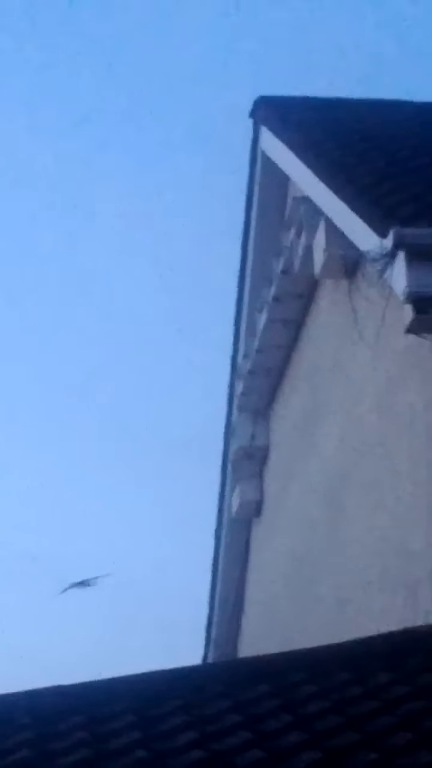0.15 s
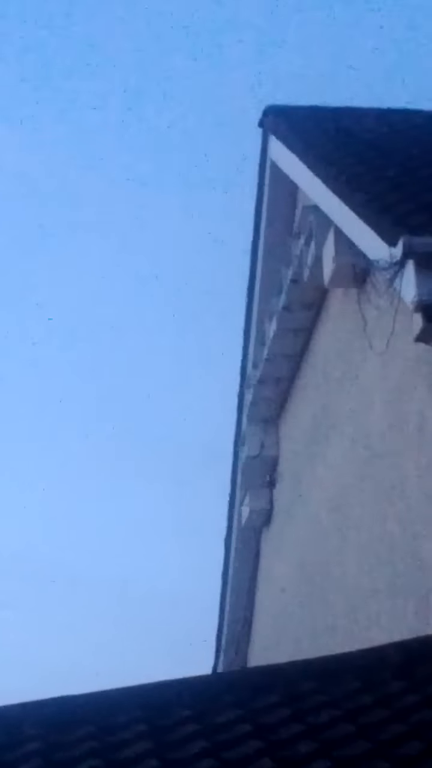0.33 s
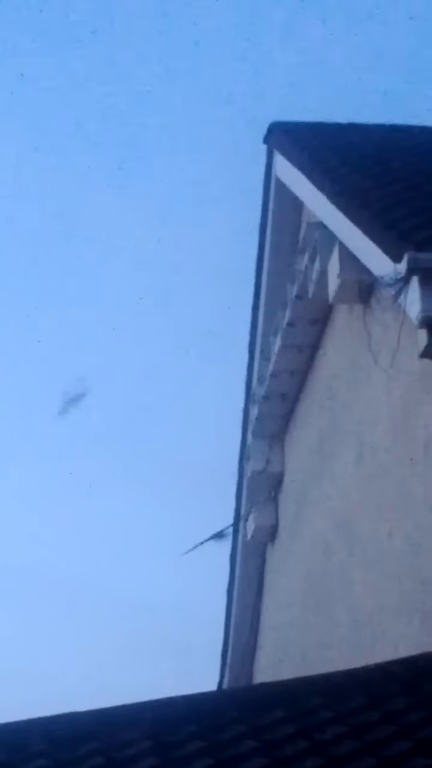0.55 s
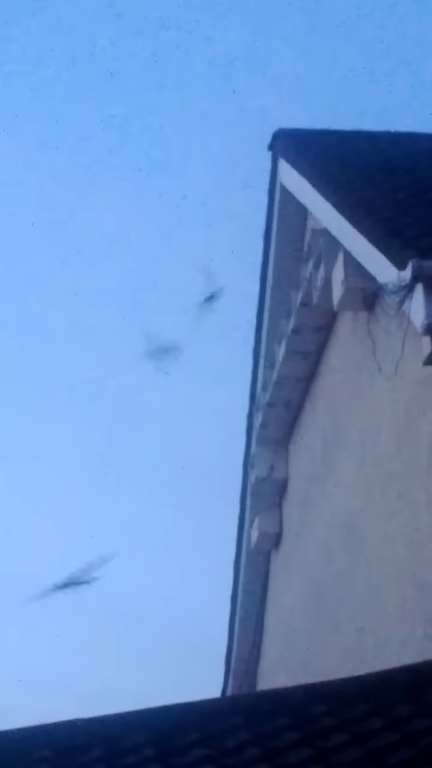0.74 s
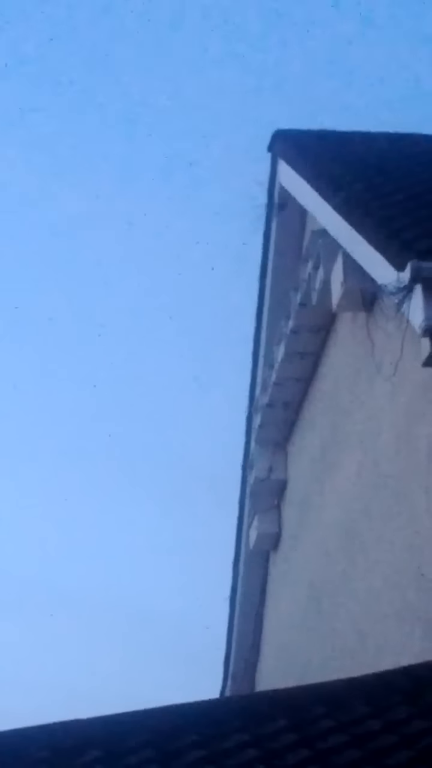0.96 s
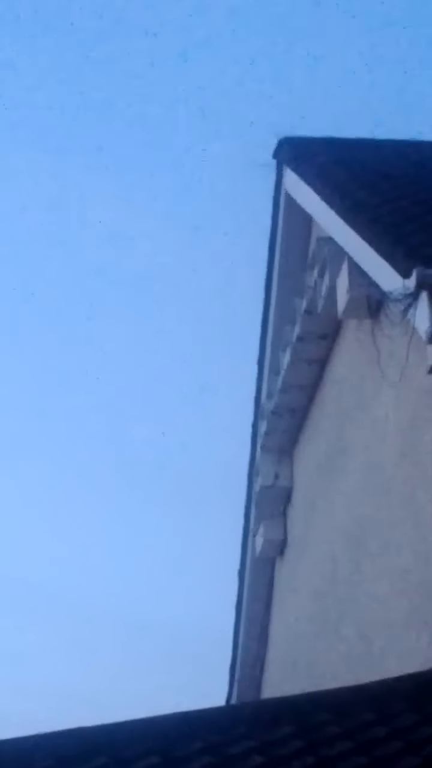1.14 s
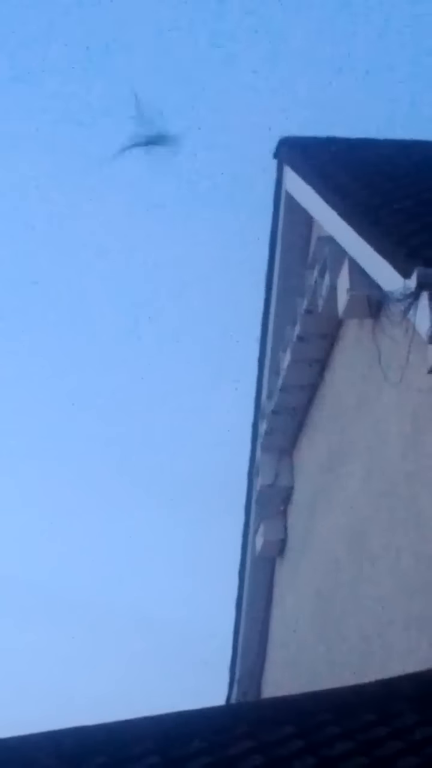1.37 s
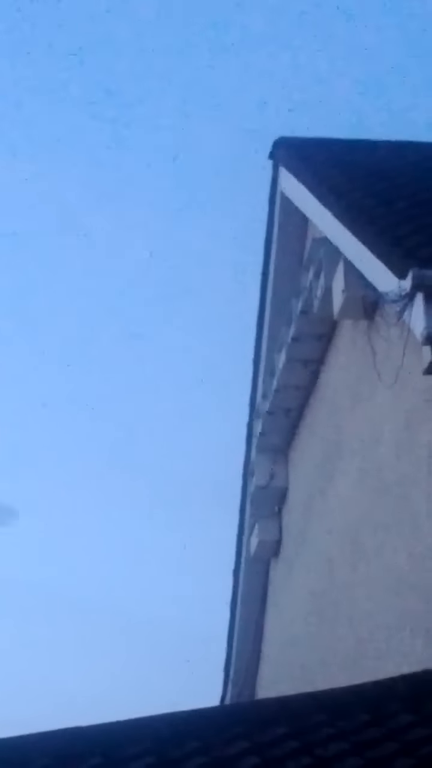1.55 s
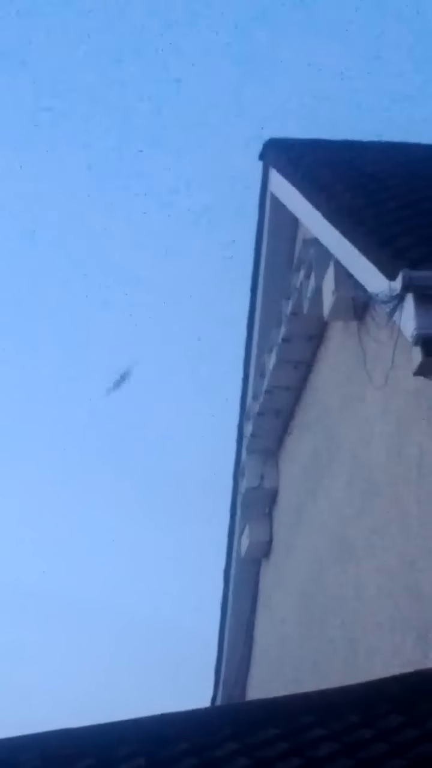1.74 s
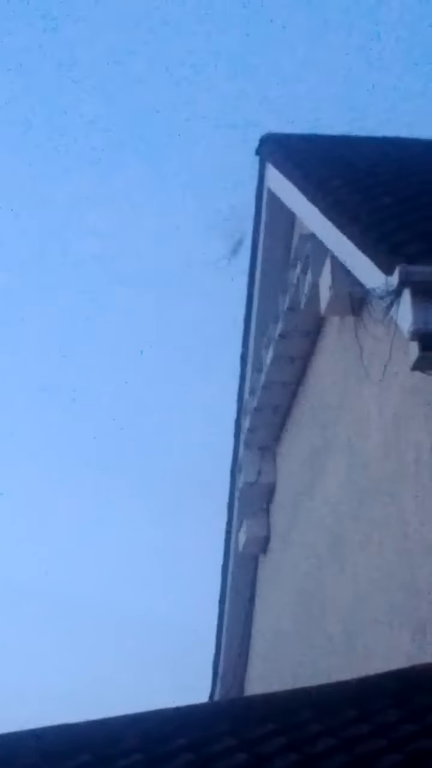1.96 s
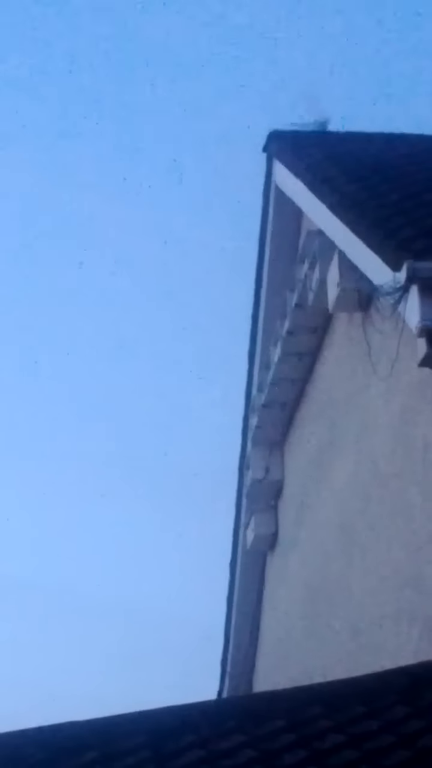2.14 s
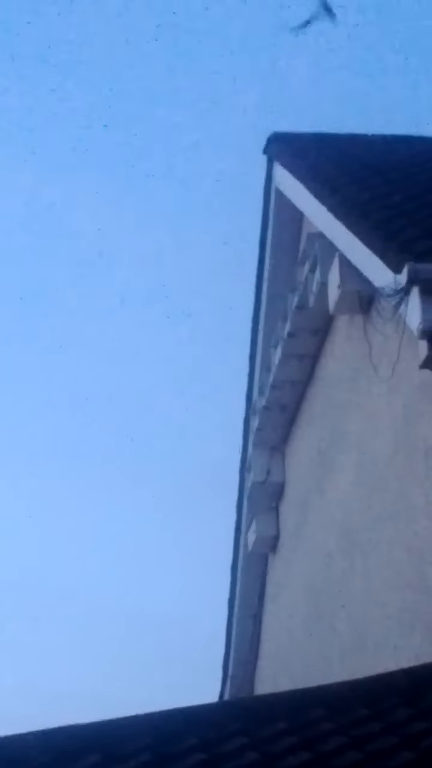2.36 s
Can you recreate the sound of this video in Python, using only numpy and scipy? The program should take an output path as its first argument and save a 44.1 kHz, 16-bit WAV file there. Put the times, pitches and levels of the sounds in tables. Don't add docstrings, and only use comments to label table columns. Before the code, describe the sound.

Swifts screaming outdoors. After a tiny silence, a shrill scream is cut in at 0.1 s and fades. A louder, buzzing pair starts near 0.5 s, stuttering into trills by 0.75-0.9 s. The strongest screams come at 0.9 and 1.2 s, with a fast falling trill and chips. Sparser notes and chips follow; fainter, more distant screams and trills come from 2 s. Low traffic hum, soft wind bumps, short echoes.

```python
import sys
import numpy as np
from scipy import signal
from scipy.fft import rfft, irfft
from scipy.io import wavfile

SR = 44100
rng = np.random.default_rng(int(sys.argv[2]) if len(sys.argv) > 2 else 0)


def linear_from_db(decibels):
    return 10 ** (np.asarray(decibels, float) / 20)


def wav_record(signal):
    frames = np.transpose(np.atleast_2d(signal))
    bounded = np.clip(frames, -1, 1)
    quanta = np.round(bounded * 32767).astype(np.int16)
    wavfile.write(sys.argv[1], SR, quanta)


N = 105840


def rms_one(x):
    return x / np.sqrt(np.mean(x ** 2) + 1e-20)


def drift(rate_hz, size):
    r = np.exp(-2 * np.pi * rate_hz / SR)
    settle = 3000
    noise = rng.standard_normal(size + settle)
    return rms_one(signal.lfilter([1], [1, -2 * r, r * r], noise)[settle:])


def filtered_noise(order, edge_hz, kind, noise):
    return signal.sosfilt(signal.butter(order, edge_hz, kind, fs=SR, output="sos"), noise)


def add(out, start_s, sound):
    i = int(start_s * SR)
    sound = sound[max(-i, 0):max(N - i, 0)]
    out[max(i, 0):max(i, 0) + len(sound)] += sound


def syrinx(hz, gate, pulse, over_db, half_db, rasp):
    # (multiple of the strong line [ratio], level [dB])
    partials = [(.5, -45), (1.5, -21.5), (2, -11.5), (2.5, -26)]
    size = len(hz)
    phase = 2 * np.pi * np.cumsum(hz) / SR + rng.uniform(0, 2 * np.pi)
    hiss = filtered_noise(3, 4300, "high", rng.standard_normal(size))
    out = gate * (np.sin(phase) + rasp * hiss)
    for multiple, level_db in partials:
        half_steps = round(2 * multiple)
        if half_steps % 2:
            strength = linear_from_db(half_db) * pulse
        else:
            strength = gate ** 0.7
        flicker = linear_from_db(2.3 * drift(300, size) + 3.06 * drift(9.2, size))
        out = out + linear_from_db(level_db + over_db) * strength * flicker * np.sin(half_steps / 2 * phase)
    return np.sqrt(2) * out


def screams():
    # (start [s], length [s], first pitch [Hz], top pitch [Hz], level [dB])
    calls = [(-.10, 0.44, 5000, 6770, -34), (0.074, .26, 4760, 6340, -48.5), (0.475, 0.24, 4540, 6600, -27),
             (0.496, 0.26, 4400, 6220, -35.5), (.63, 0.17, 4010, 5640, -56.5),
             (0.899, 0.28, 4450, 6442, -24.5), (0.976, 0.24, 4150, 5480, -32.5),
             (1.177, .25, 4802, 6050, -24), (1.32, 0.27, 5300, 6900, -38), (1.697, 0.135, 4350, 5200, -38),
             (1.699, 0.34, 5000, 6400, -50.5), (2.001, .13, 5300, 7200, -41.5),
             (1.98, 0.3, 4450, 5365, -47), (2.084, 0.25, 6230, 7300, -60), (2.033, 0.46, 6000, 6590, -51.5),
             (1.669, 0.047, 3850, 4480, -36.5), (0.985, 0.1, 4300, 5000, -45),
             (2.112, .07, 6150, 6170, -42.5)]
    # (pitch rise [s], sag [Hz/s], fade [dB/s], overtones [dB], hoarseness [0-1])
    voices = [(0.027, 1004, 13, 3, 0.99), (0.13, -1, -30, 1.5, 1), (.04, 800, 18.5, 9, 0.4),
              (0.036, 1611, -24.5, -3.5, 0.44), (0.054, 309, 10, 12.5, 0.9), (.02, 2989, 60, 4, .6),
              (0.011, 500, 60, 4, 0.42), (.03, 292.5, 45, 2.5, 0.65), (0.06, 3500, 30, 7, 0.96),
              (0.022, 1200, 40, -4, 0.4), (0.05, 900, 31, 5, 0.99), (0.12, 2200, 3, 11, 0.6),
              (0.038, 1196.5, 35, 2, 1), (0.12, 300, 6, 3, 1), (0.017, 209, 6.5, 6, 0.96),
              (0.006, 300, 20, 3, 0.7), (0.02, 300, 30, 0.5, 0.4), (0.02, 7000, 30, 7, 1)]
    half_levels = [-20, -8, -4, 1, 12, -1, -13, 3, -12, -3, -2, -6, -5, -5, -22, -10, -10, -10]
    throb_hz, throb_wander, throb_grows_s = 260.4, 0.035, 0.056
    throb_bend_hz, wobble_hz = 95, 80.5
    attack_s, release_s, swell_db, swell_s = 0.005, 0.02, 9.5, 0.01
    half_grows_s, half_peak_s, half_fade_db_per_s = 0.035, 0.11, 150
    out, t = np.zeros(N), np.arange(SR // 2) / SR
    size = len(t)
    for call, voice, half_db in zip(calls, voices, half_levels):
        start, length, first_hz, top_hz, db = call
        rise, sag, fade, over_db, hoarse = voice
        depth = np.clip(hoarse * (1.25 - np.exp(-t / throb_grows_s)), 0, 1)
        throb_rate = throb_hz * (1 + throb_wander * (rng.normal() + drift(54, size)))
        beat = 2 * np.pi * np.cumsum(throb_rate) / SR
        gate = 1 - depth + 2 * depth * np.cos(beat / 2) ** 2
        gate = gate * linear_from_db(1.2 * depth * drift(180, size))

        hz = top_hz - (top_hz - first_hz) * np.exp(-(t / rise) ** 0.7) - sag * t
        hz = hz + depth * (throb_bend_hz * np.sin(beat) + wobble_hz * drift(160, size))
        hz = hz + 25 * drift(26.1, size)

        late = np.clip(t / half_grows_s, 0, 1) ** 2
        late = late * linear_from_db(3.0 - half_fade_db_per_s * np.maximum(t - half_peak_s, 0))
        pulse = (1 + np.cos(beat)) ** 1.37 * late
        rasp = linear_from_db(-12.5) * depth ** 2 * np.clip(t / 0.12, 0.1, 1)

        shape = np.clip(t / attack_s, 0, 1) * np.clip((length - t) / release_s, 0, 1)
        level_db = db - fade * t + 1.37 * drift(16.5, size) - swell_db * np.exp(-t / swell_s)
        add(out, start, shape * linear_from_db(level_db) * syrinx(hz, gate, pulse, over_db, half_db, rasp))
    return out


def far_traffic():
    # (frequency [Hz], level [dB per Hz])
    spectrum = [(15, -33), (25, -1), (69, 1.5), (185, -9), (405, -13.5), (977, -6.5), (1550, -19.5),
                (2220, -30.5), (3000, -21), (3900, -123), (6600, -120)]
    out, band_edges = 0, 22 * 2 ** np.arange(0, 7.6, 0.5)
    white = rng.standard_normal((2, N))
    hz, db = np.transpose(spectrum)
    for k, (low, high) in enumerate(zip(band_edges, band_edges[1:])):
        band = filtered_noise(2, [low, high], "band", white[k % 2])
        band_db = np.interp(np.log(low * high) / 2, np.log(hz), db)
        out = out + band * linear_from_db(band_db + 0.4 * drift(12, N))
    return linear_from_db(-49) * rms_one(out)


def air():
    return linear_from_db(-59.5) * filtered_noise(2, 3000, "high", rng.standard_normal(N))


def street(x):
    # (delay [s], level [dB])
    echoes = [
        (.015, -22),
        (.031, -13),
    ]
    t60_s, tail_db = 0.46, -7
    t = np.arange(SR // 2) / SR
    tail = rng.standard_normal(len(t)) * linear_from_db(-60 * t / t60_s) * np.clip(t / 0.0033, 0, 1)
    tail = linear_from_db(tail_db) * tail / np.sqrt(np.sum(tail ** 2))
    for delay, db in echoes:
        add(tail, delay, np.array([linear_from_db(db)]))
    return signal.fftconvolve(x, tail)[:N]


def chips():
    # (start [s], peak level [dB], centre pitch [Hz], length [s], pitch blur [Hz])
    calls = [(0.0912, -43, 4100, 0.008, 110), (0.866, -39, 3950, 0.007, 110),
             (0.931, -41, 3950, 0.004, 110), (1.1175, -48, 4120, 0.006, 500),
             (1.1288, -39.5, 4100, 0.013, 400), (1.168, -44, 3950, 0.005, 400),
             (1.177, -45, 3900, 0.004, 300), (1.2153, -39, 4230, 0.006, 110),
             (1.2617, -35, 4250, 0.006, 110), (1.2845, -34, 4200, 0.0065, 110),
             (1.310, -39, 4130, 0.006, 110), (1.333, -40, 4100, 0.005, 400), (1.345, -46, 3900, 0.004, 300),
             (1.5795, -46, 4400, 0.012, 450), (1.594, -49, 4400, 0.018, 450),
             (1.7471, -40, 3800, 0.005, 200), (1.759, -43, 3830, 0.005, 200),
             (1.819, -46, 4000, 0.005, 500), (1.829, -46, 4000, 0.004, 500),
             (1.8394, -31, 4150, 0.005, 110), (1.9107, -33, 4170, 0.0085, 110),
             (1.9357, -36, 4080, 0.007, 110), (1.9616, -42, 3950, 0.004, 200),
             (2.1038, -48, 4130, 0.005, 110), (2.378, -48, 4500, 0.009, 300)]
    fall_hz, chip_db, octave_db, twelfth_db, scratch_db = 900, -1.5, -5.5, -15, -20
    out = np.zeros(N)
    for start, db, centre_hz, length, blur_hz in calls:
        u = np.arange(SR // 40) / SR / length
        gate = np.clip(u / 0.11, 0, 1) * np.clip((1.2 - u) / 0.73, 0, 1)
        gate = gate * linear_from_db(2.0 * drift(130, len(u)))
        hz = centre_hz + fall_hz * (0.45 - u) + blur_hz * drift(400, len(u))
        phase = 2 * np.pi * np.cumsum(hz) / SR
        tone = np.sin(phase) + linear_from_db(octave_db) * np.sin(2 * phase) + linear_from_db(twelfth_db) * np.sin(3 * phase)
        scratch = linear_from_db(scratch_db) * np.diff(rng.standard_normal(len(u) + 2), 2)
        add(out, start, linear_from_db(db + chip_db) * gate * (tone + scratch))
    return out


def wind():
    # (centre [s], width [s], level [dB])
    gusts = [
        (0.133, 0.01, -34.5),
        (.43, 0.062, -51),
        (0.916, 0.0063, -36),
        (.945, 0.0098, -35),
    ]
    out, t = np.zeros(N), np.arange(N) / SR
    for centre, width, db in gusts:
        swell = np.exp(-((t - centre) / width) ** 2)
        out = out + linear_from_db(db) * swell * np.cos(2 * np.pi * 56.5 * (t - centre))
    return out


def note(length, hz, drop_hz, over_db, attack):
    t = np.arange(SR // 40) / SR
    gate = np.clip(t / attack, 0, 1) * np.clip((length - t) / 0.0021 + 0.5, 0, 1)
    gate = gate * linear_from_db(0.76 * drift(100, len(t)))
    return syrinx(hz - drop_hz * (t / length - 0.5), gate, gate, over_db, 0.1, linear_from_db(-15))


def trills():
    # (first note [s], last note [s], first pitch [Hz], last pitch [Hz], level [dB])
    fast_trills = [
        (0.342, 0.455, 6180, 4550, -27),
        (1.141, 1.268, 5810, 4690, -26),
        (2.186, 2.252, 5580, 5340, -40.5),
        (2.214, 2.349, 5220, 4300, -39.5),
    ]
    note_counts = [10, 11, 6, 11]
    trill_overtones = [7, 1.5, 8, -1.5]
    # (start [s], length [s], pitch [Hz], level [dB], overtones [dB])
    slow_notes = [(0.744, 0.0059, 5570, -28.5, 8), (0.768, 0.0067, 5670, -32, 12.5),
                  (0.795, 0.005, 5600, -25, 1), (0.817, 0.0044, 5540, -31.5, 12),
                  (0.841, 0.0027, 5290, -32, 12), (0.794, 0.0034, 6010, -27, 9),
                  (0.819, 0.0079, 6170, -29, 13), (0.847, 0.0062, 6060, -30.5, 9.5),
                  (0.876, 0.0044, 5920, -26.5, 5.5), (.903, 0.0052, 5850, -28, 0),
                  (1.442, 0.0095, 5930, -33, 6.5), (1.469, 0.0083, 6084, -30, 8.5),
                  (1.493, 0.0066, 6110, -32.5, 7.5), (1.516, .012, 5904, -36, 4),
                  (1.548, .010, 5720, -37.5, 4.5), (1.568, 0.012, 5630, -42, -6),
                  (1.861, .010, 5224, -33, 5), (1.885, 0.012, 5227, -33, 1),
                  (2.271, 0.0076, 5800, -41.5, 0), (2.299, 0.0067, 5830, -42.5, 8),
                  (2.326, 0.004, 5520, -38.5, -7), (2.336, 0.0038, 6190, -39, -1),
                  (2.364, .008, 6850, -45, 11), (2.394, 0.0062, 6750, -49, 18)]
    note_s, arch_db = 0.006, 7.5
    out = np.zeros(N)
    for trill, count, over_db in zip(fast_trills, note_counts, trill_overtones):
        first, last, first_hz, last_hz, db = trill
        for u in np.linspace(0, 1, count):
            hz = first_hz + (last_hz - first_hz) * u ** 2.37
            level = linear_from_db(db - arch_db * (2 * u - 0.6) ** 2)
            sound = note(note_s * (1 - 0.51 * u), hz, 850 * (0.12 + u), over_db - 2.5 * u, 0.0012)
            add(out, first + u * (last - first), level * sound)
    for start, length, hz, db, over_db in slow_notes:
        add(out, start, linear_from_db(db) * note(length, hz, 69.0, over_db, 0.0007))
    return out


def scene():
    birds = screams() + trills() + chips()
    return (birds + street(birds) + far_traffic() + wind() + air())[None]


def top_cut(x):
    return signal.sosfilt(signal.butter(12, 16760, fs=SR, output="sos"), x)


def record(dry):
    # (frequency [Hz], gain [dB])
    response = [(5000, -1), (7500, 1.5), (8800, -6.5), (9800, -4.5), (11500, -2), (13000, -3.5),
                (14000, -2), (15500, -5)]
    start_s, fade_s, band_limit_hz = 0.0785, 0.0005, 15990
    hz = np.fft.rfftfreq(N, 1 / SR)
    mic_hz, mic_db = np.transpose(response)
    gain = linear_from_db(np.interp(hz, mic_hz, mic_db)) * (hz < band_limit_hz)
    coloured = irfft(rfft(dry) * gain, N)
    opening = np.clip((np.arange(N) / SR - start_s) / fade_s, 0, 1)
    return top_cut(coloured * opening)


dry = scene()
out = record(dry)
wav_record(out)
```